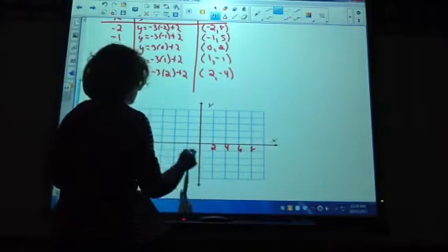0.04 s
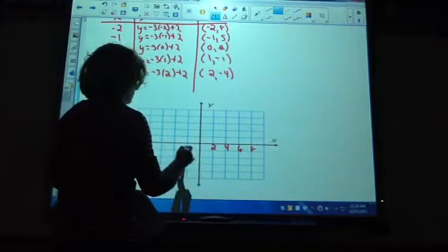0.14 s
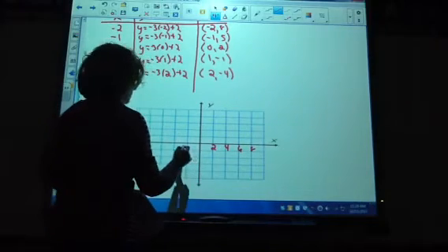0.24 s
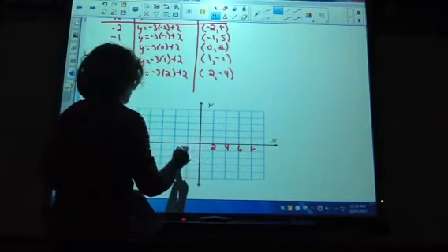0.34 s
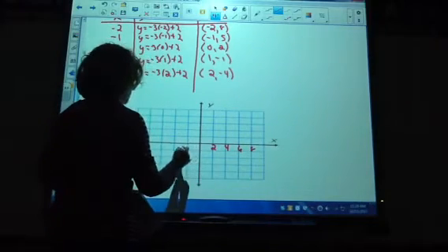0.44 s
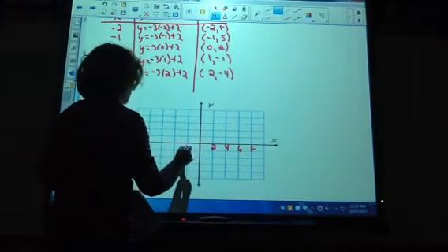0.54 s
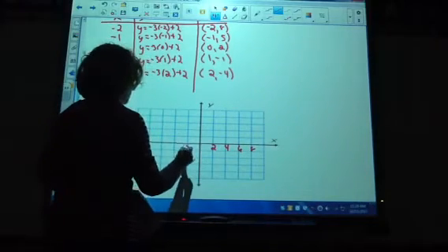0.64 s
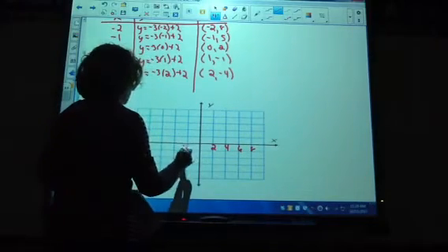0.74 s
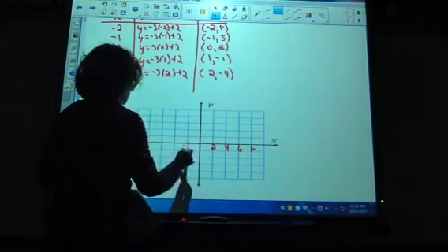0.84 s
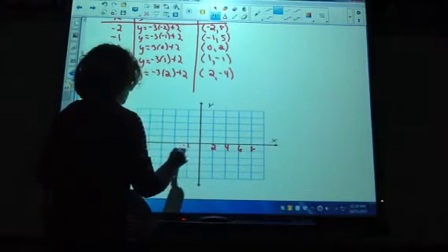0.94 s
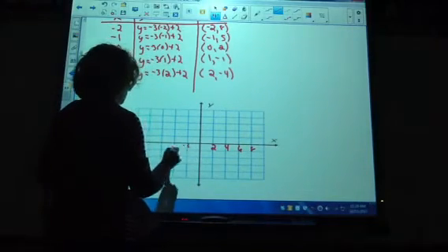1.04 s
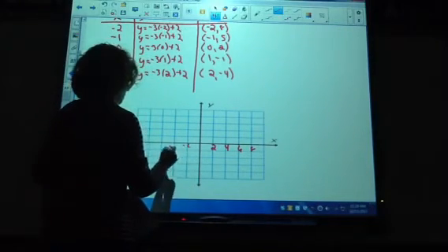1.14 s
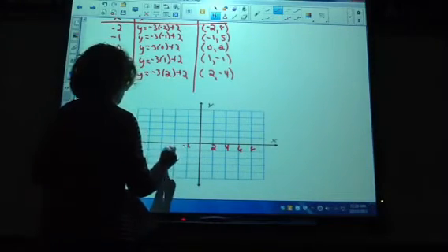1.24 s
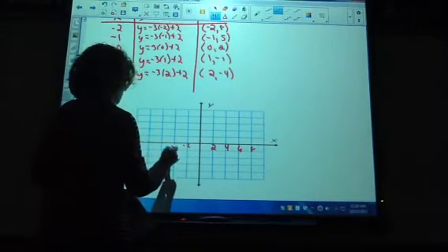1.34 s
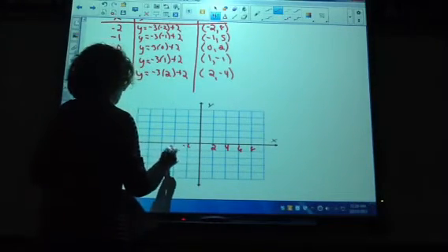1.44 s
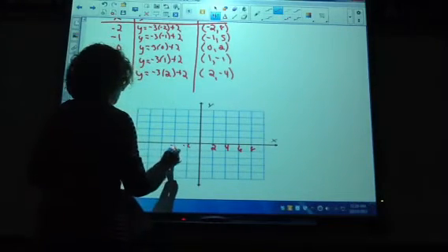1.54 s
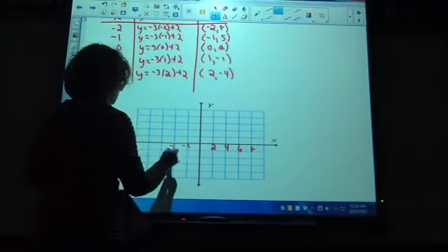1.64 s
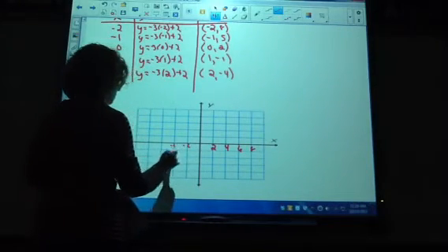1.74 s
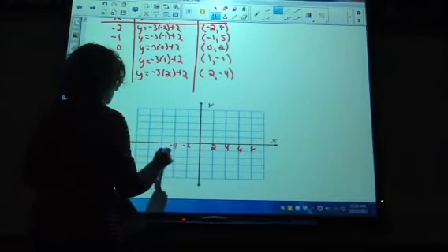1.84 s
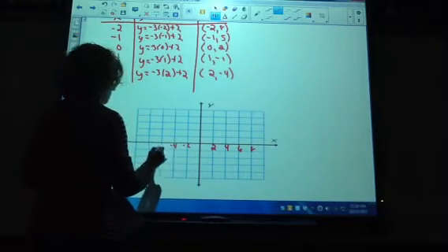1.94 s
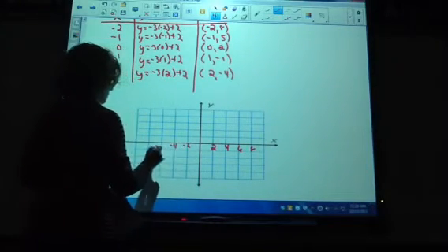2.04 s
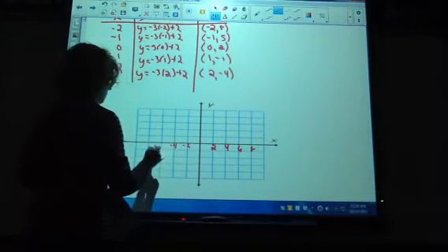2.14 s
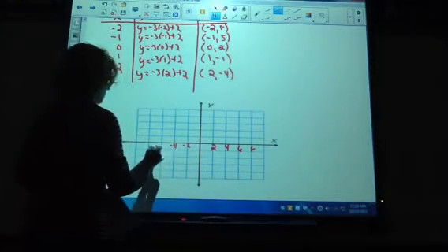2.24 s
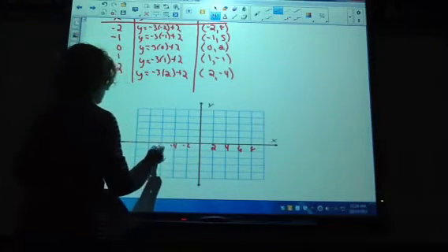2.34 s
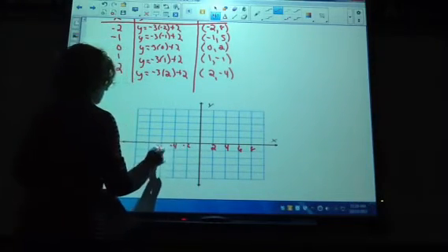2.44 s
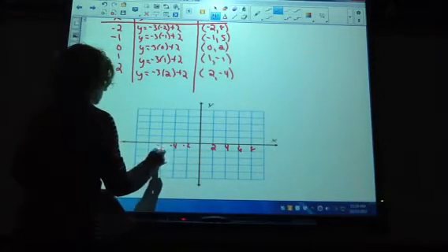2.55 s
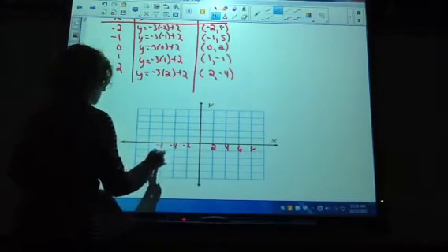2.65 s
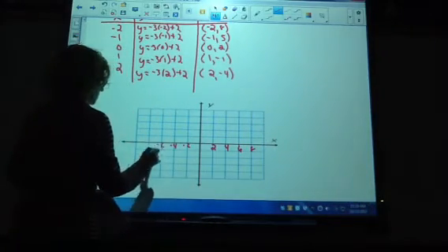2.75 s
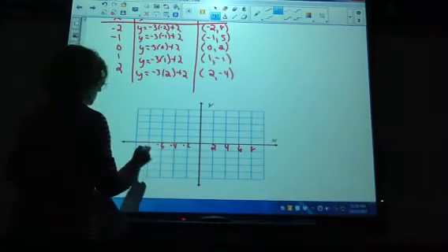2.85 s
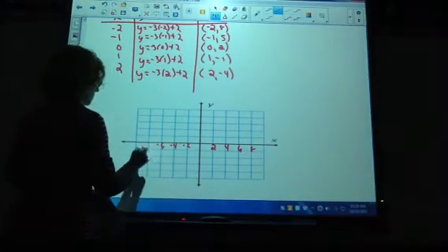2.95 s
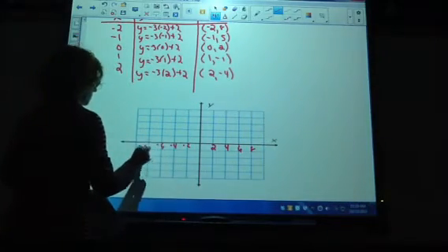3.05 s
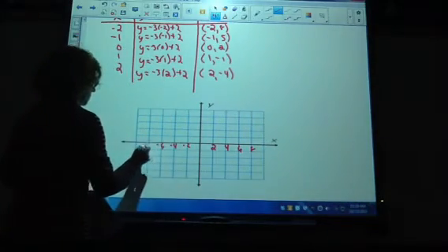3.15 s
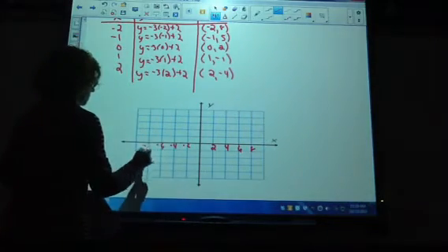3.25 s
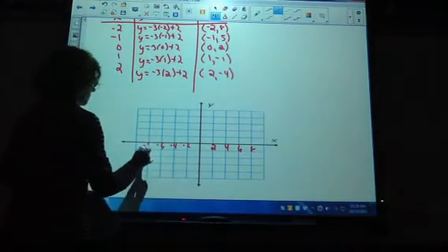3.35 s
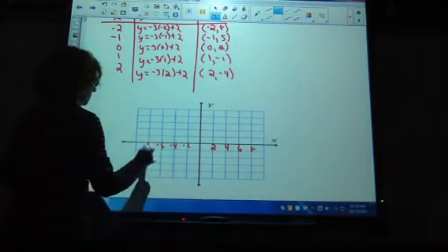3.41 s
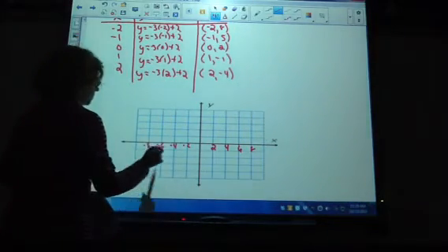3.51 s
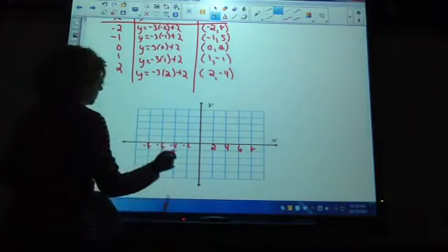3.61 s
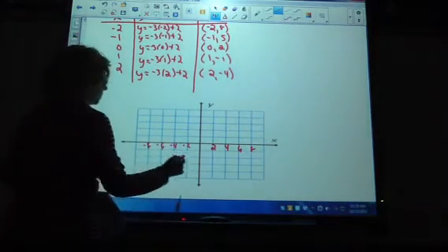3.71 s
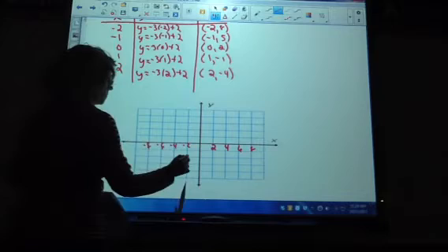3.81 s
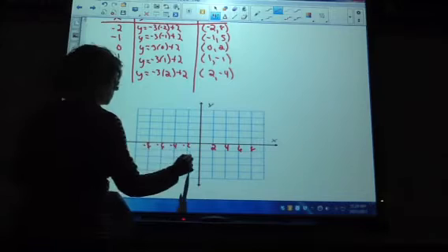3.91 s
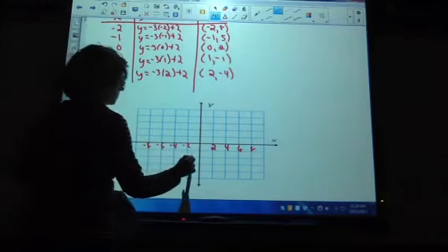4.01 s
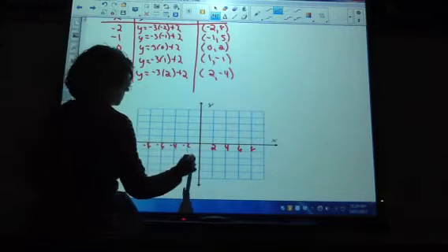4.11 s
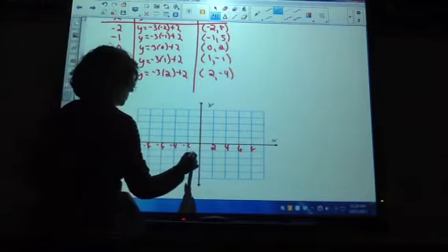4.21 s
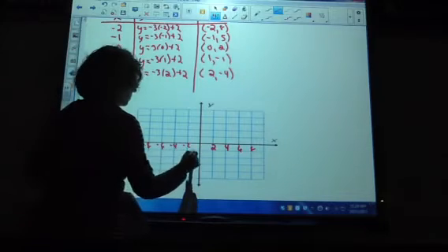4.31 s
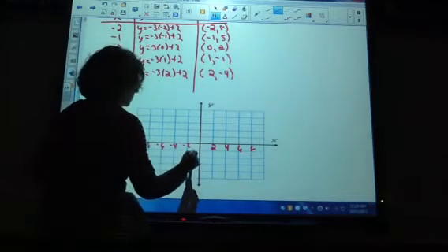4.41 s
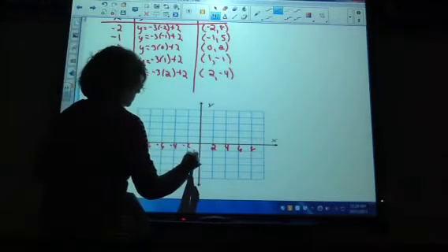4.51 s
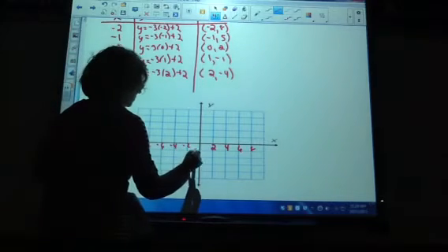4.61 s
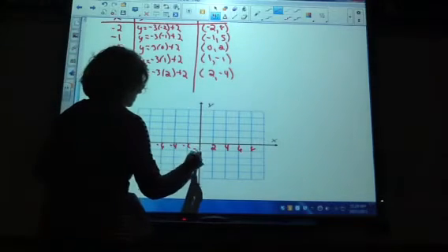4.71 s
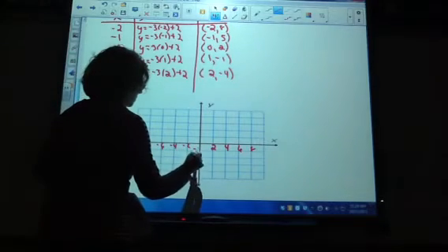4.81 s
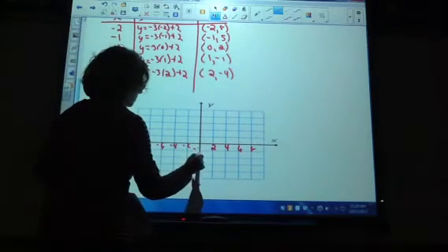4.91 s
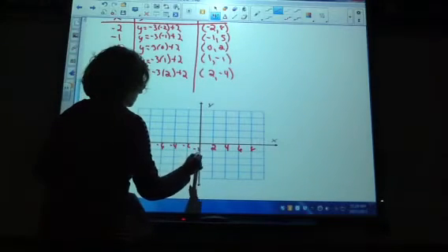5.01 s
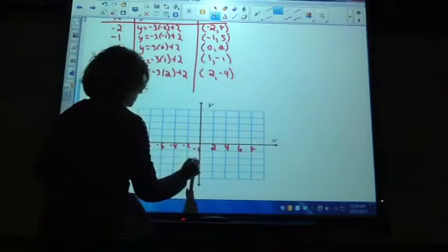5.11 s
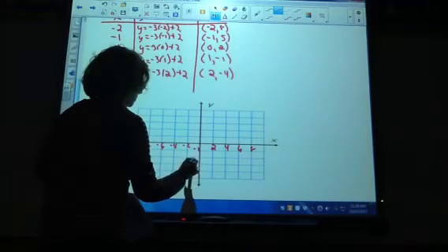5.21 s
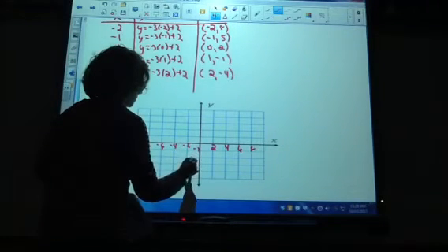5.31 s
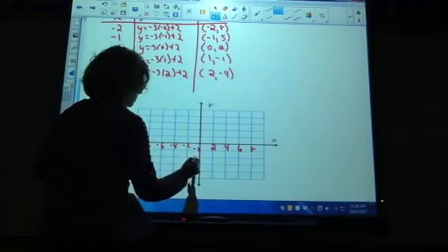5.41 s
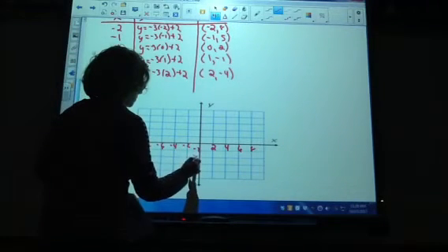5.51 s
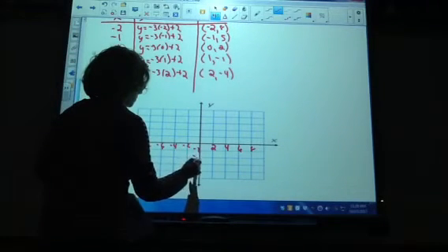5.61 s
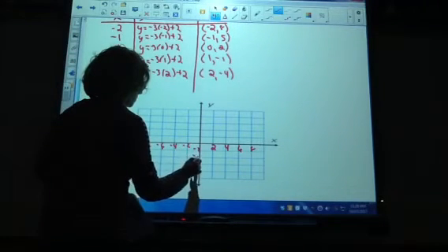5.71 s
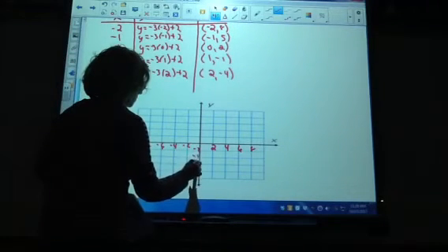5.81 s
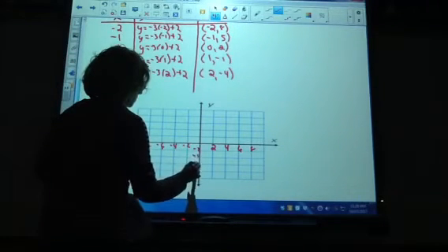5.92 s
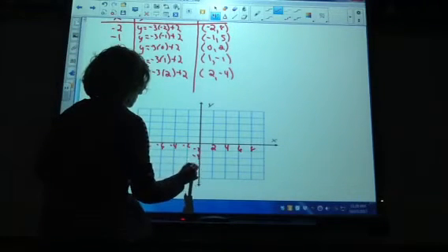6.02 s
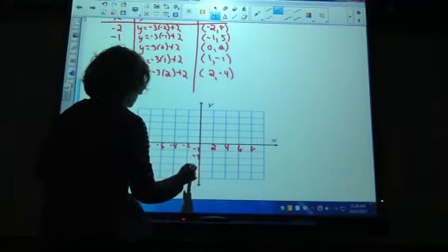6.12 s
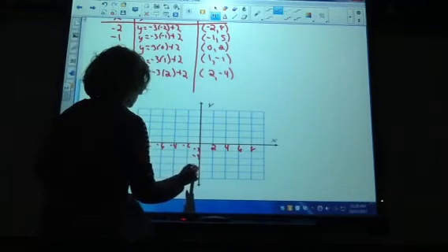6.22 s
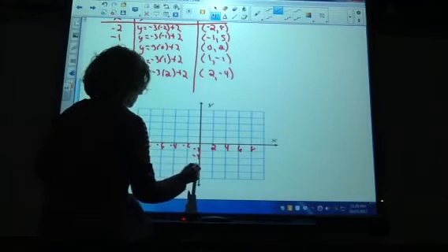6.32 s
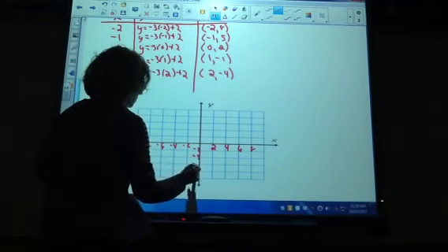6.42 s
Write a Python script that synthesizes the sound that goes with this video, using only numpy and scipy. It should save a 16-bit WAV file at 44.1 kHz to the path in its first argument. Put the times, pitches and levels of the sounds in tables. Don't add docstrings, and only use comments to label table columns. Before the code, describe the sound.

A stylus taps a large hollow board in small uneven groups, each tick and dull thud ringing briefly over a steady projector fan hum.

```python
import sys
import numpy as np
from scipy import signal
from scipy.fft import rfft, irfft
from scipy.io import wavfile
from scipy.ndimage import uniform_filter1d

SR = 44100
rng = np.random.default_rng(int(sys.argv[2]) if len(sys.argv) > 2 else 0)


def level_to_linear(level):
    exponent = np.asarray(level, float) / 20
    return 10 ** exponent


def store_wav(level_fs):
    pcm = np.round(np.clip(np.atleast_2d(level_fs), -1, 1) * 32767)
    wavfile.write(sys.argv[1], SR, pcm.T.astype(np.int16))


N = 284886

# pitch in Hz, level in dB (rms).
FAN_LINES = [(234.6, -77), (258.4, -73), (301.5, -68), (339.1, -79.5), (376.8, -71.5), (409.1, -77.5),
             (452.2, -79.5), (516.8, -80.5), (581.4, -81), (812.9, -85.5), (904.4, -83.5)]
# frequency in Hz, level in dB per Hz.
AIR_COLOUR = [(24, -81), (40, -32), (129, -22), (149, -12), (215, -11), (292, -4.5), (481, -14), (586, -11),
              (648, -16.5), (917, -19), (988, -21.5), (2250, -23.5), (3510, -25.5), (9740, -26.5),
              (15200, -28.5)]
# frequency in Hz, time to fall by 60 dB in seconds.
ROOM_T60 = [(130, 1), (260, 0.59), (520, 0.5), (900, 0.35), (1600, 0.54), (4000, 0.067)]
# delay in ms, level in dB from the right end, level in dB from the left end.
ECHOES = [(5.705, 9, 0), (7.885, -1, -3), (9.59, -6, 0.5), (12.976, 6, -3.5), (38.5, -5.5, -13),
          (63.75, -21, -3.5), (77.0, -18, -11)]
# start in seconds, length in seconds, rub level in dB.
STROKES = [
    (.74, 0.17, -71.5),
    (1.62, 0.035, -78),
    (1.705, 0.11, -71.5),
    (2.48, 0.29, -72),
    (3.2, 0.27, -75),
    (3.33, 0.23, -72.5),
    (4.8, 0.25, -73.5),
    (5.62, 0.052, -77),
    (5.81, 0.14, -73.5),
]
# pitch in Hz, level in dB, time to fall by 60 dB in seconds.
BARREL = [(1458, -3.5, 0.012), (1960, 1.5, 0.0016), (2424, -12, 0.014), (3500, 6.5, 0.0014),
          (4350, -8, 0.0032), (5560, -13, 0.0024)]
# start in seconds, blow in dB, contact in ms, how much earlier the tip closes in ms,
# hardness in dB.
TOUCHES = [(0.4392, -25, 2.33, 8.1, 1.5), (0.6455, -25.5, 2, 8, -7.5), (1.2571, -25.5, 1.71, 6.1, -2.5),
           (1.466, -27.5, 1.9, 7.9, -3), (1.6829, -25.5, 1.51, 5.5, 0), (2.2345, -24.5, 1.46, 5.4, -2.5),
           (2.4364, -26, 1.45, 8.7, -2.5), (2.9934, -22, 0.65, 3.7, 1), (3.185, -28, 1.8, 11, -6),
           (4.548, -25, 1.75, 5.8, 1), (4.76, -25.5, 1.64, 5.7, 4.2), (5.377, -28.5, 1.92, 11, -7),
           (5.5923, -27.5, 1.61, 7.5, -0.5), (5.79, -28.5, 1.48, 15, 1.3), (6.2115, -28, 1.45, 7.0, 1.5),
           (6.4575, -25, 2.08, 11, -19)]
# time in seconds, place from 0 (right end) to 1 (left end).
HAND = [
    (.5, 0.32),
    (1.3, 0.55),
    (2.4, 0.97),
    (3.0, 0.92),
    (3.3, 0.93),
    (4.5, 0.054),
    (6.4, 0.042),
]
# pitch in Hz, level in dB struck at the right, level in dB struck at the left, 60 dB fall in seconds.
KNOCK = [(223.3, -7, -4, 0.034), (288, 4, 5.5, .013), (580, 3.5, 2.1, 0.014), (793, -23.5, -9, 0.024),
         (927, -25, -14, 0.03), (1110, -40, -16.5, 0.018), (1430, -23, -30, 0.035)]
# pitch in Hz, level in dB struck at the right, level in dB struck at the left, 60 dB fall in seconds.
BOARD_MODES = [(154.4, -12, -11.5, 0.51), (184, 4, 0.5, 0.059), (255.2, -9.5, -8, 0.38),
               (295.6, -10.5, -9, 0.39), (430.5, -19.5, 2.5, 0.12), (494.7, -2.5, -11, 0.35),
               (502, -39, -10.5, 0.1), (536, -5, -27, 0.25), (575, -24.5, -36, 0.11)]
# pitch in Hz, level in dB, 60 dB fall in seconds.
WALL = [(69.6, -54.5, 0.52), (87.8, -46, 0.55), (117, -43, 0.81), (115, -63, 0.48)]

AIR_DB, FAN_WHINE_HZ = -60, 2390
BASS_CUT_HZ, TOP_HZ = 178, 15400
TAIL_START_MS, EARLY_DB, EARLY_FADE_MS = 12, -3.5, 11
LULL_MS, LULL_WIDTH_MS, LULL_DB = 163, 15, -5
BACK_WALL_MS, BACK_WALL_DB = 33, -10
SLIDE_WAIT_S, SLIDE_S, SLIDE_DB = 0.028, 0.082, -76.5
TICK_DB, TICK_DB_PER_MS, USUAL_LEAD_MS = -51.5, -0.6, 10.1
RATTLE_DB, RATTLE_PER_HARDNESS = -32, 0.28
LIFT_S, LIFT_DB, LIFT_HZ = 3.5188, -52, 4400


def rms_one(x):
    return x / np.sqrt(np.mean(x ** 2) + 1e-20)


def at_hz(points, hz):
    table_hz, value = np.array(points).T
    return np.interp(np.log(hz), np.log(table_hz), value)


def band(x, low_hz, high_hz):
    return signal.sosfilt(signal.butter(2, [low_hz, high_hz], "band", fs=SR, output="sos"), x)


def bass_cut(x, order, hz):
    return signal.sosfilt(signal.butter(order, hz, "high", fs=SR, output="sos"), x)


def drift(rate_hz):
    r = np.exp(-80 * np.pi * rate_hz / SR)
    slow = signal.lfilter([1], [1, -2 * r, r * r], rng.standard_normal(N // 40 + 2002))
    slow = rms_one(slow[2000:])
    return np.interp(np.arange(N) / 40, np.arange(len(slow)), slow)


def ring(clicks, hz, t60):
    r, w = level_to_linear(-60 / (t60 * SR)), 2 * np.pi * hz / SR
    return signal.lfilter([0, np.sin(w)], [1, -2 * r * np.cos(w), r * r], clicks + 1e-18)


def evened(noise):
    power = uniform_filter1d(noise ** 2, size=SR // 80, axis=-1)
    return noise / np.sqrt(power / np.mean(noise ** 2))


def fan():
    t = np.arange(N) / SR
    lines = 0
    for hz, db in FAN_LINES:
        level = np.sqrt(2) * level_to_linear(db + 1.2 * drift(0.83))
        lines = lines + level * np.sin(2 * np.pi * hz * t + 0.25 * drift(2.6) + 7 * rng.random())
    white = rng.standard_normal((2, N))
    edges = 40 * 2 ** np.arange(0, 8.8, 1 / 3)
    air = 0
    for k, (low, high) in enumerate(zip(edges, edges[1:])):
        air = air + level_to_linear(at_hz(AIR_COLOUR, np.sqrt(low * high))) * band(white[k % 2], low, high)
    air = bass_cut(air, order=2, hz=75)
    whine = rms_one(band(rng.standard_normal(N), FAN_WHINE_HZ - 220, FAN_WHINE_HZ + 220))
    return lines + level_to_linear(AIR_DB - 3.5) * rms_one(air) + level_to_linear(-81.5) * whine


def room(x, tail_db, high_echo_db):
    t = np.arange(SR // 2) / SR
    edges = 110 * 2 ** np.arange(0, 6.1, .5)
    white = rng.standard_normal((2, 3, len(t)))
    tails = 0
    for k, (low, high) in enumerate(zip(edges, edges[1:])):
        fading = level_to_linear(-60 * t / at_hz(ROOM_T60, np.sqrt(low * high)))
        tails = tails + evened(band(white[k % 2], low, high)) * fading
    ms = t * 1000 - TAIL_START_MS
    lull = np.exp(-((t * 1000 - LULL_MS) / LULL_WIDTH_MS) ** 2)
    crowd_db = np.where(ms < 0, -80, EARLY_DB * np.exp(-ms / EARLY_FADE_MS) + LULL_DB * lull)
    paths = level_to_linear(tail_db + crowd_db) * (tails[0] + 0.22 * tails[1:])
    paths[:, 0] = 1
    for delay_ms, right, left in ECHOES:
        paths[:, round(delay_ms * SR / 1000)] += level_to_linear(np.array([right, left]) + high_echo_db)
    return signal.fftconvolve(x, paths, axes=1)[:, :N].sum(0)


def rub():
    t = np.arange(N) / SR
    slides = [(row[0] + SLIDE_WAIT_S, SLIDE_S, SLIDE_DB) for row in TOUCHES]
    level = np.zeros(N)
    for start, length, db in list(STROKES) + slides:
        level += level_to_linear(db) * np.sin(np.pi * np.clip((t - start) / length, 0, 1))
    grains = rng.standard_normal(N) * (rng.random(N) < .15)
    grains = grains * level_to_linear(1.9 * drift(25))
    barrel = rms_one(band(grains, low_hz=1790, high_hz=6500) + 0.046 * ring(grains, hz=4480, t60=0.0051))
    panel = rms_one(band(grains, low_hz=570, high_hz=1070))
    return level * (barrel + level_to_linear(-2.5) * panel)


def pen():
    tick, thud = np.zeros((2, N))
    s, db, contact_ms, lead_ms, hardness_db = np.transpose(TOUCHES)
    tick_at = ((s - lead_ms / 1000 + .0006) * SR).astype(int)
    tick[tick_at] = level_to_linear(TICK_DB + TICK_DB_PER_MS * (lead_ms - USUAL_LEAD_MS) - 21.0)
    tick = ring(ring(tick, hz=3420, t60=0.0064), hz=3825, t60=0.0083)
    lift = ring(level_to_linear(LIFT_DB) * (np.arange(N) == int(LIFT_S * SR)), LIFT_HZ, t60=.004)
    thud[(s * SR).astype(int)] = level_to_linear(db + RATTLE_DB + RATTLE_PER_HARDNESS * hardness_db)
    dying = level_to_linear(-60 / (0.034 * SR))
    rattle = signal.lfilter([1], [1, -dying], thud) * rng.standard_normal(N)
    barrel = sum(level_to_linear(level_db) * ring(rattle, hz, t60) for hz, level_db, t60 in BARREL)
    sound = tick + lift + level_to_linear(-12.0) * barrel
    lag = round(BACK_WALL_MS * SR / 1000)
    sound[lag:] += level_to_linear(BACK_WALL_DB) * sound[:-lag]
    return np.array([sound, np.zeros(N)])


def blows(contact_share, hard):
    out, n = np.zeros((2, N + 400)), np.arange(400)
    for s, db, contact_ms, lead_ms, hardness_db in TOUCHES:
        start, length = s * SR, contact_share * contact_ms * SR / 1000
        first = int(start)
        push = np.sin(np.pi * np.clip((n - start % 1) / length, 0, 1)) / length
        place = np.clip(np.interp(s, *np.transpose(HAND)), 0, 1)
        out[:, first:first + 400] += level_to_linear(db + hard * hardness_db) * push * [[1 - place], [place]]
    return out[:, :N]


def board():
    force = blows(contact_share=0.95, hard=False)
    front = blows(contact_share=0.59, hard=True)
    knock = 0
    for k, (hz, right, left, t60) in enumerate(KNOCK):
        drive = force if hz < 700 else front
        knock = knock + (-1) ** k * level_to_linear([[right], [left]]) * ring(drive, hz, t60)
    modes = sum(ring(level_to_linear([right, left]) @ force, hz, t60) for hz, right, left, t60 in BOARD_MODES)
    low_push = band(band(force.sum(0), low_hz=60.4, high_hz=126), low_hz=60.4, high_hz=126)
    wall = sum(level_to_linear(db) * ring(low_push, hz, t60) for hz, db, t60 in WALL)
    return knock, level_to_linear(-2.5) * modes, wall


def scene():
    knock, modes, wall = board()
    knock_in_room = room(knock, tail_db=-23.5, high_echo_db=0.54)
    pen_in_room = room(pen(), tail_db=-34.0, high_echo_db=-16.5)
    hits = bass_cut(knock_in_room + modes + pen_in_room, order=8, hz=BASS_CUT_HZ)
    return (hits + wall + rub() + fan())[None]


def low_pass(x):
    return signal.sosfilt(signal.butter(12, 15380, fs=SR, output="sos"), x)


def record(dry):
    kept = np.arange(N // 2 + 1) * SR / N < TOP_HZ
    mix = irfft(rfft(dry) * kept, N)
    return low_pass(mix)


dry = scene()
out = record(dry)
store_wav(out)
```